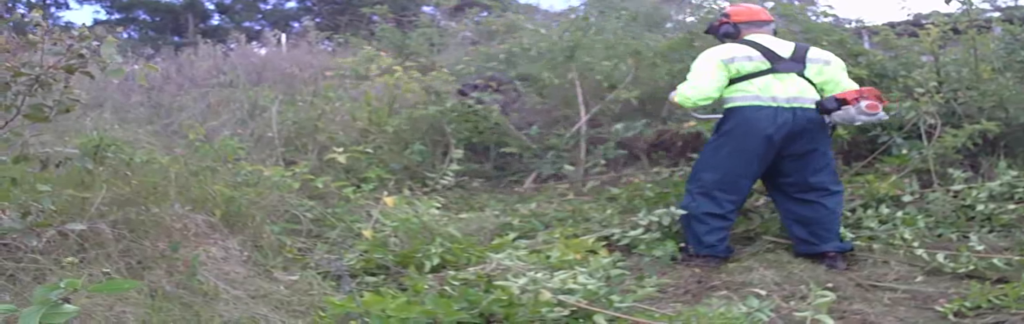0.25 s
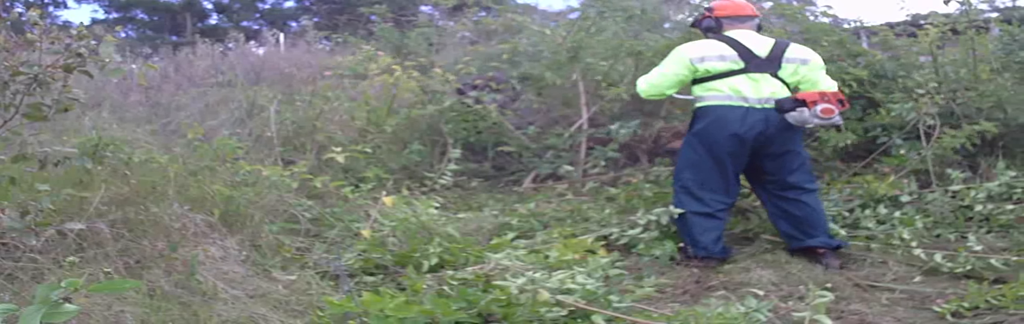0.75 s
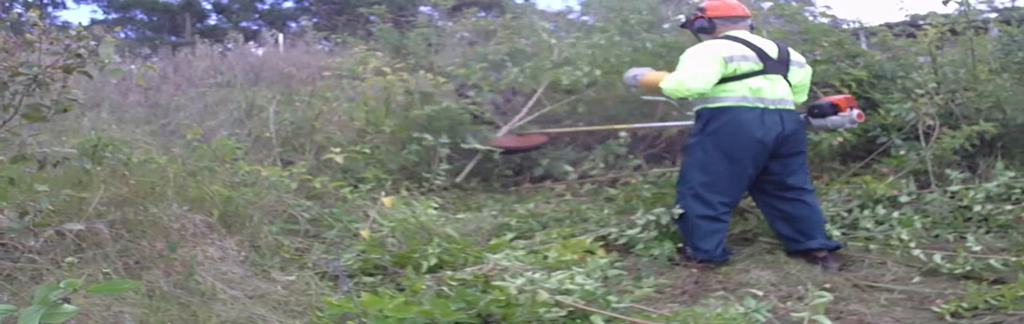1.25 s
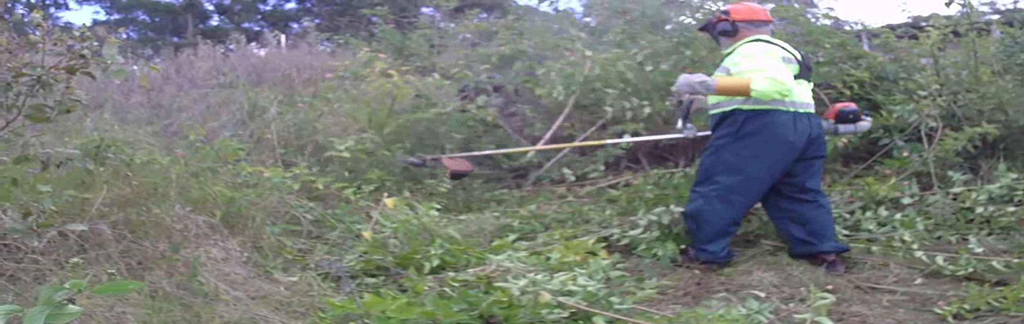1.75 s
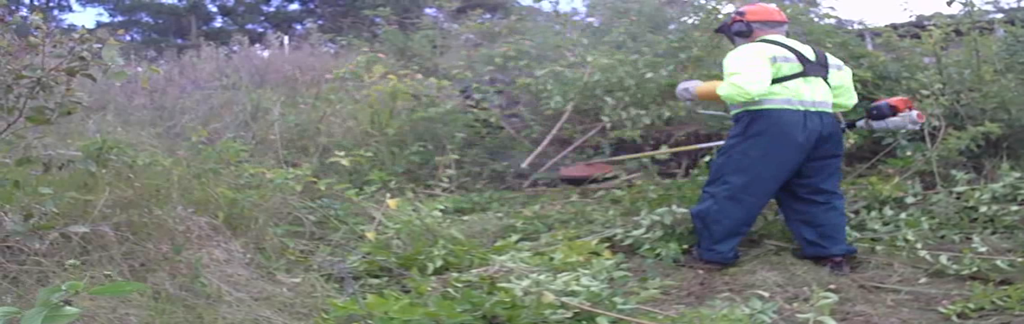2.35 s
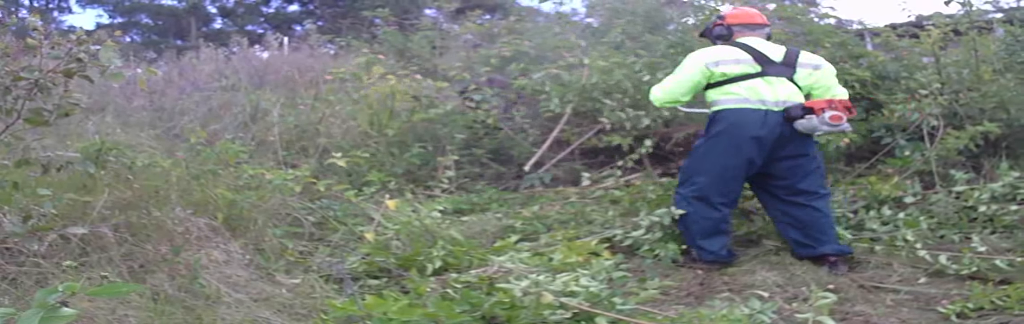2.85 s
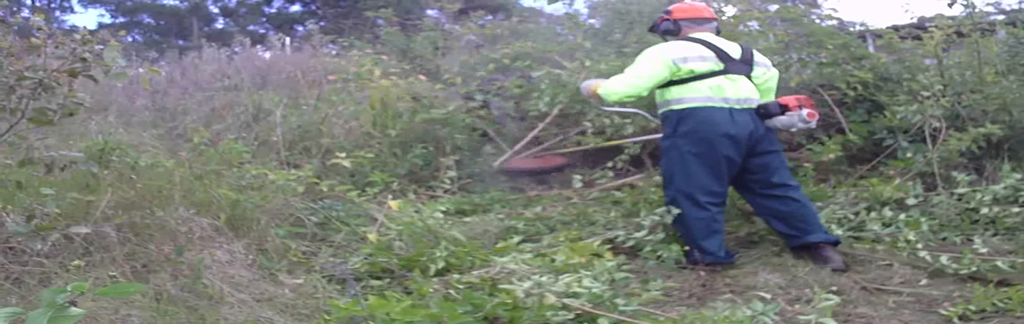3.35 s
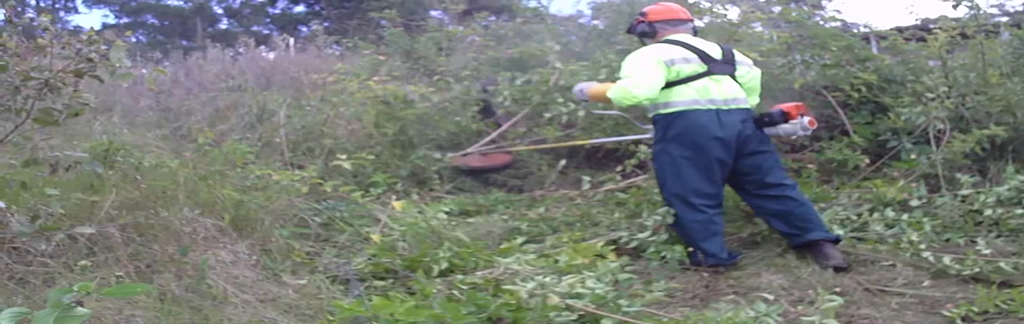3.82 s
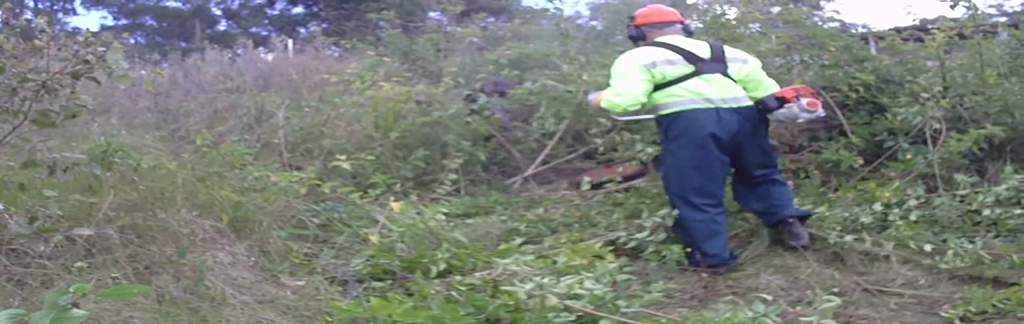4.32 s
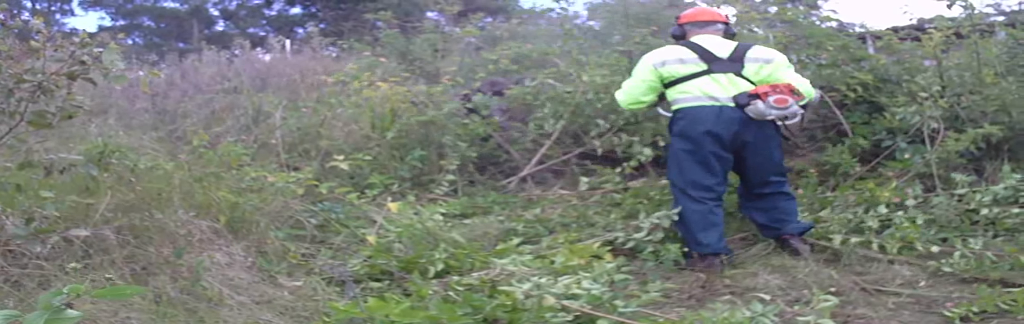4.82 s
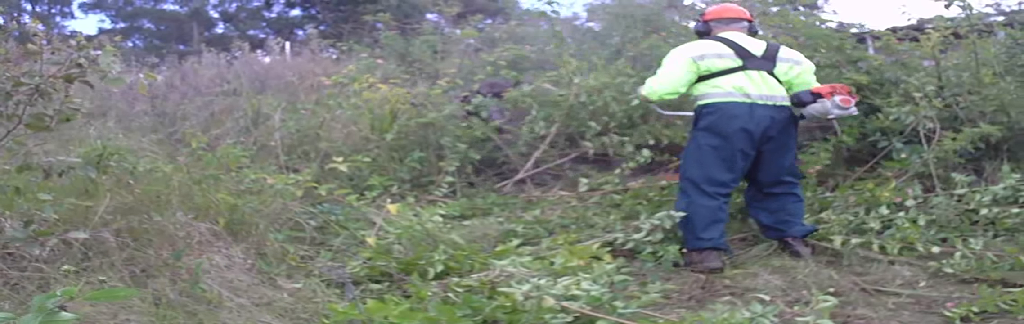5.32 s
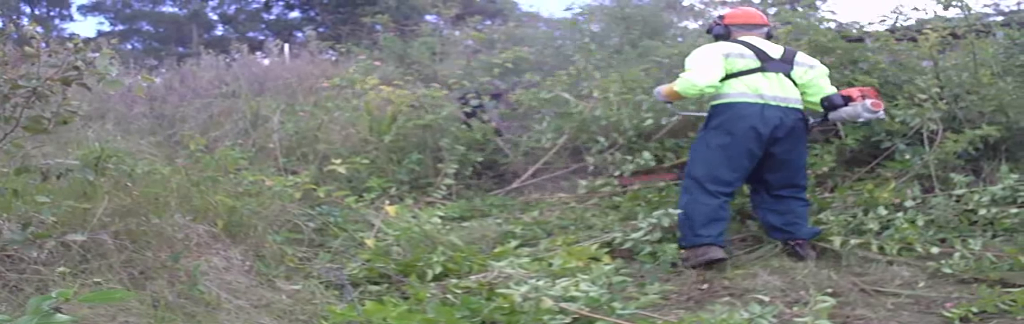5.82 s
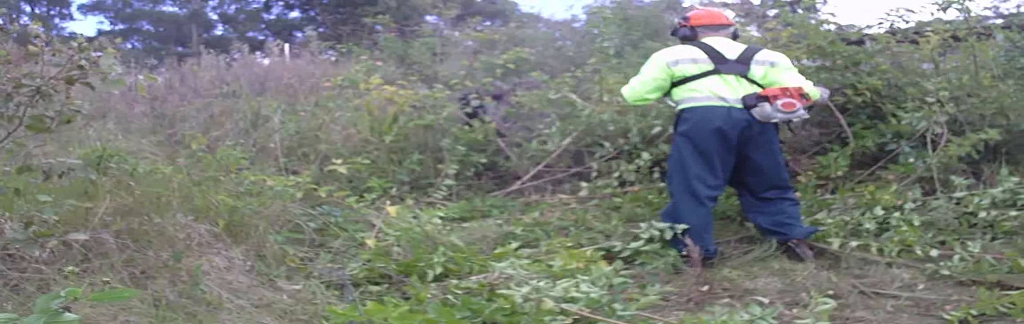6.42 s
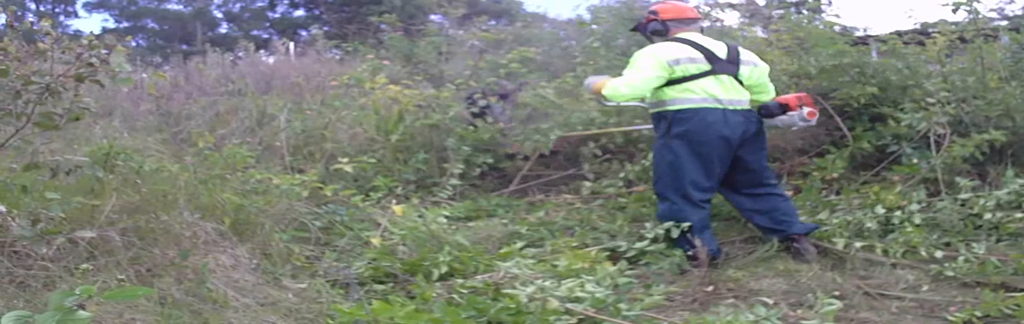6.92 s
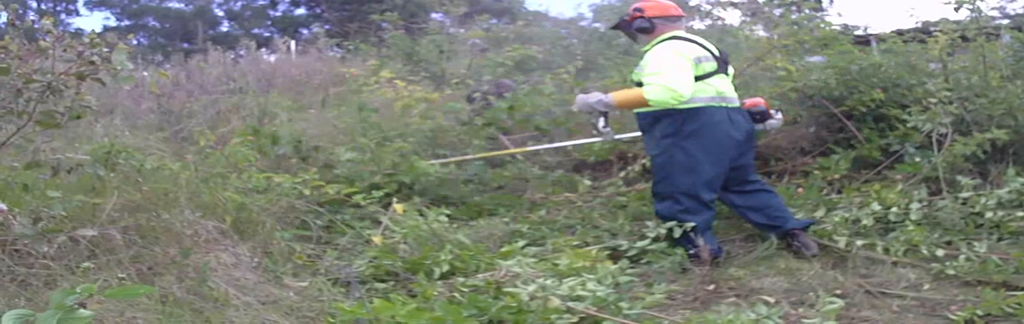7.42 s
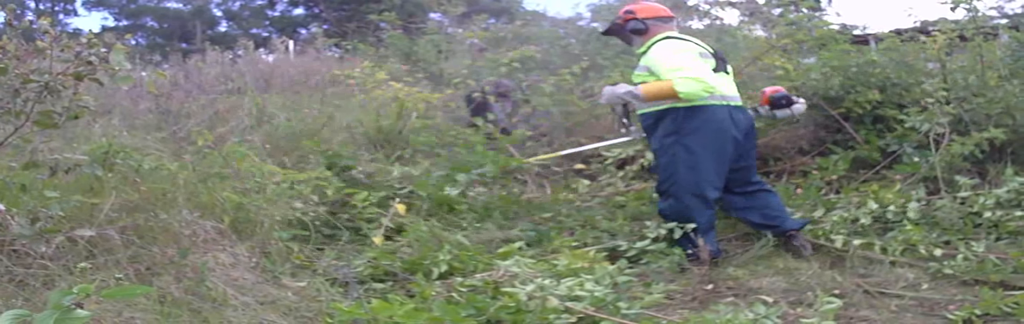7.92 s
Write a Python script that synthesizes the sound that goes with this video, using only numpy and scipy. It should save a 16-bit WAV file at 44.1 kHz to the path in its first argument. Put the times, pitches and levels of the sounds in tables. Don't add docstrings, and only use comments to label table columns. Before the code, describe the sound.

A petrol brushcutter works a few metres away outdoors, loud and centred, over faint low field rumble and short scatter from bushes. At 0 s the engine is bogged, jerking roughly while stems snap; it climbs to full, ringing revs by 1 s, briefly skipping sparks. Sharp cracks at 1.1-1.4 s accompany a light sag. From about 1.8 to 3.2 s it stutters and pops on the limiter, with more stem cracks from 2.1 s. A thick clump drags it down at 3.3 s; it recovers near 3.9 s and stutters until 5 s. Then comes the deepest bog, coarse and lower, with clustered cracks and woody knocks through 5.9 s. Revs climb back over 6 s, dip at 6.7 s, and return to limiter skips from 7.3 s to the end near 8.2 s. Blade hiss and leafy shredding pulse throughout; the level ducks after hard blows.

```python
import sys
import numpy as np
from scipy import signal
from scipy.fft import rfft, irfft
from scipy.io import wavfile
from scipy.ndimage import uniform_filter1d

SR = 44100
rng = np.random.default_rng(int(sys.argv[2]) if len(sys.argv) > 2 else 0)


def wav_record(signal):
    frames = np.transpose(np.atleast_2d(signal))
    bounded = np.clip(frames, -1, 1)
    quanta = np.round(bounded * 32767).astype(np.int16)
    wavfile.write(sys.argv[1], SR, quanta)


def gain_from_db(level_db):
    decades = np.asarray(level_db, float) / 20
    return 10 ** decades


N = 360297
T = np.arange(N) / SR
TOP_SPEED_HZ = 85.6
RING_HZ = 3262

# (time [s], share turned side-on [0-1])
SIDE_ON = [(0, 1.07), (.45, 0.23), (.95, 0.17), (1.3, 1), (2.0, 1), (2.5, .6), (2.8, 0.23), (3.2, 0.33),
           (3.39, 1), (4.0, 0.77), (4.45, 0.08), (5.0, 0.25), (5.4, 1), (5.9, 0.8), (6.2, 0.14), (6.62, 0),
           (6.97, 1), (8.17, 0.8)]


def level(x, db):
    return x * gain_from_db(db) / np.sqrt(np.mean(x ** 2))


def colour(x, points):
    hz, db = np.transpose(points)
    log_hz = np.log(np.arange(1, N // 2 + 2) * SR / N)
    gain = gain_from_db(np.interp(log_hz, np.log(hz), db, left=-80, right=-80))
    return level(irfft(rfft(x) * gain, N), 0)


def white():
    return rng.standard_normal(N)


def follow(points):
    return np.interp(T, *np.transpose(points))


def walk(rate_hz, s=T):
    return 1.2 * np.interp(s * rate_hz, np.arange(600), rng.standard_normal(600))


def resonance(hz, centre_hz, half_width_hz):
    return 1 / (1 + ((hz - centre_hz) / half_width_hz) ** 2)


def puff(phase, sharp, spread_db):
    size = gain_from_db(spread_db * rng.standard_normal(4000))[phase.astype(int)]
    return uniform_filter1d(size, size=30) * np.exp(-sharp * np.cos(2 * np.pi * phase))


def field_rumble():
    # (frequency [Hz], density [dB per Hz])
    rumble = [(20, 1), (60, -3), (120, -2), (220, -2.5), (320, -2)]
    return gain_from_db(-53) * colour(white(), rumble)


def bushes(dry):
    t = np.arange(3000) / SR
    echoes = rng.standard_normal(3000) * np.exp(-t / 0.012) * (t > .003)
    return gain_from_db(-21) * signal.fftconvolve(dry, echoes / np.sqrt(np.sum(echoes ** 2)))[:N]


def stems():
    # (time [s], peak [dB], knock over peak [dB])
    woody = [(0.0169, 2, -23), (0.0905, 4.5, -31), (0.17, -2, -20), (0.2335, 0, -34), (1.2054, 8, -31),
             (2.1268, 7, -21), (2.4154, -2, -24), (2.6513, 0, -18), (2.8486, -2, -19), (3.059, -5, -20),
             (3.1057, -2, -14), (3.2126, 7, -31), (3.324, 5, -26), (4.016, -1, -15), (4.0635, -3, -28),
             (4.334, 3, -33), (4.5749, 2, -14), (4.6818, -2, -4), (5.0717, -1, -9), (5.1809, 6, -16),
             (5.6133, 0.5, -10), (5.655, 3, -17), (5.6825, 3, -17), (5.7355, -3, -24), (5.7832, -6, -9),
             (5.8796, -11, -26), (6.0555, -1, -13), (6.091, 2, -18), (6.2927, -10, -11), (6.6265, -6, -21)]
    # (time [s], peak [dB], knock over peak [dB])
    more_stems = [(1.068, 6, -15), (1.098, 3, -6.5), (1.11, -4, -14), (1.125, -1, -10), (5.09, 0, -20),
                  (1.382, -7, -22), (3.274, 4, -21), (3.299, 0, -13), (5.205, 1, -12), (5.305, -4, -3),
                  (5.322, -2, -24), (5.44, -2, -8), (5.461, -1, -24), (5.812, 0, -9), (6.713, 6, -14),
                  (7.379, 5, -36), (7.715, -8, -22)]
    wood = signal.butter(2, (600, 1900), "band", fs=SR, output="sos")
    lead, length = 1000, 4000
    out = np.zeros(N + length)
    t = (np.arange(length) - lead) / SR
    for (s, peak_db, knock_db), tone in zip(woody + more_stems, rng.random(100)):
        noise = rng.standard_normal((2, length))
        tearing = np.exp(-np.abs(t) / .0003) + .15 * np.exp(-np.abs(t - .002) / .006)
        crack = signal.lfilter([1, 0, -1], [1, -.7 - .5 * tone, .4], noise[0] * tearing)
        knock = signal.sosfilt(wood, noise[1]) * np.exp(-np.abs(t - .002) / 0.0072)
        i = max(int(s * SR) - lead, 0)
        blow = crack / np.abs(crack).max() + gain_from_db(knock_db + 4.5) * knock
        out[i:i + length] += gain_from_db(peak_db - 3.5) * blow
    return signal.sosfilt(signal.butter(2, 400, "high", fs=SR, output="sos"), out[:N])


def speed():
    # (time [s], speed lost [Hz], fall [s], hold [s], climb back [s])
    sags = [
        (-.2, 12, .1, 0.19, .83),
        (1.051, 3.5, 0.077, 0.28, 0.29),
        (3.273, 5.5, 0.072, .17, .37),
        (4.38, 1.03, 0.137, 0.3234, 0.1377),
        (5.06, 13.5, 0.27, 0.51, 0.69),
        (5.419, 2, 0.1004, .12, 0.1997),
        (5.901, -0.8, 0.305, 0.0479, 0.251),
        (6.448, 1.06, 0.091, .14, 0.053),
        (6.681, 3.5, 0.085, 0.12, 0.34),
    ]
    lost = 0
    for s, lost_hz, fall_s, hold_s, climb_s in sags:
        lost = lost + np.interp(T, np.cumsum([s, fall_s, hold_s, climb_s]), [0, lost_hz, lost_hz, 0])
    return uniform_filter1d(TOP_SPEED_HZ - lost + .28 * walk(9), size=1500)


def sparks(cycle):
    # (from [s], to [s], one spark dropped in so many [cycles])
    cuts = [(.96, 1.1, 2), (1.76, 2.15, 2), (2.25, 2.4, 2), (2.56, 2.89, 3), (2.95, 3.14, 3),
            (3.18, 3.28, 2), (3.9, 4.06, 2), (4.12, 4.28, 3), (4.38, 4.5, 3), (4.56, 5.04, 3),
            (7.33, 7.5, 4), (7.6, 7.72, 4), (7.9, 8.07, 2), (8.12, 8.17, 2)]
    fired = np.ones(N)
    for start, end, every in cuts:
        fired[(T > start) & (T < end) & (cycle.astype(int) % every == 0)] = 0
    return uniform_filter1d(fired, size=60)


def jerks(cycle):
    lag_cycles, decay_cycles, jolt_per_hz = .25, .25, .085
    lost_hz = np.clip(TOP_SPEED_HZ + 2 - np.gradient(cycle) * SR, 0, 18)
    cycle = cycle + 1 - lag_cycles
    size = gain_from_db(2.5 * rng.standard_normal(4000))[cycle.astype(int)]
    jolt = 1 + jolt_per_hz * lost_hz * size * np.exp(-(cycle % 1) / decay_cycles)
    return uniform_filter1d(jolt, size=60) / np.sqrt(uniform_filter1d(jolt ** 2, size=5000))


def blade(cycle, bite, jerk, hum_db, hiss_db, shred_db):
    # (frequency [Hz], density [dB per Hz])
    air = [(3300, -11.5), (4200, 0.5), (5000, 0.5), (5800, -1), (7200, 0.5), (9300, -3), (10300, -4.5),
           (11500, -17)]
    # (frequency [Hz], density [dB per Hz])
    leaves = [(7400, -28), (8800, -5), (9600, -8.5), (10600, -6.5), (12500, -4.5), (14000, -12),
              (15900, -19)]
    teeth = 30 / 7 * cycle
    hum = gain_from_db(hum_db - 17.5 + 1.4 * walk(3.46)) * np.sin(2 * np.pi * teeth)
    gate = bite * puff(teeth, 0.11, 0.99)
    grains = rng.standard_normal((2, N)) * gain_from_db(2.0 * np.minimum(rng.exponential(size=(2, N)), 5))
    hiss = gain_from_db(.5 * walk(27)) * colour(gate * jerk * grains[0], air)
    shred = gain_from_db(0.42 * walk(14)) * colour(gate * jerk ** 0.18 * grains[1], leaves)
    return hum + gain_from_db(hiss_db - 0.55) * hiss + gain_from_db(shred_db + 0.4) * shred


def orders(cycle, fired, turn, limiting):
    behind = [-32, -21, -19.5, -3.5, -13, -22, -6, -19.5, -11.5, -16, -26.5, -12.5, -12, -10.5, -27.5,
              -13.5, -10, -23, -35, -8, -18, -28, -31, -9, -8, -21, -18, -17, -24, -24, -25, -14, -16, -8.5,
              -18, -22, -13.5, -18, -19, -9]
    side = [-32.5, -25.5, -30.5, -6, -15.5, -4.5, -5.5, -20, -16, -13, -15.5, -13.5, -26, -11.5, -15, -26,
            -33, -23, -16, -14.5, -22, -24, -30, -13, -33, -25, -13, -25, -27, -16.5, -20, -17, -33, -22,
            -24, -27, -22, -13, -28, -19]
    bog = {5: -.2, 6: -.15, 7: -.4, 9: -.4, 12: -.7, 24: -.5}
    coast = {4: -4, 5: -14, 7: -22, 8: 40, 13: -8}
    parts, hop = np.zeros((3, N)), 32
    hz = np.gradient(cycle) * SR
    strain = np.clip(-uniform_filter1d(np.gradient(hz), size=3000) * SR / 30, 0, 1)[::hop]
    s, hz, turn, limiting = T[::hop], hz[::hop], turn[::hop], limiting[::hop]
    for k, (behind_db, side_db) in enumerate(zip(behind, side), start=1):
        db = behind_db + turn * (side_db - behind_db) - 1
        db = db + (.9 + (k % 4 > 0) * .05 * k + strain) * walk(7, s)
        db = db + 6 * (1 - strain) * (1 - .6 * turn) * resonance(k * hz, RING_HZ, 70)
        db = db + 3.5 * (1.2 - 1.5 * limiting) * resonance(k * hz, 1110, 90)
        db = db - strain * (3 + 7 * (k > 4)) + bog.get(k, 0) * (TOP_SPEED_HZ - 2 - hz)
        db = db + limiting * coast.get(k, 0) * (1 if k < 6 else 1 - turn)
        db = db + 2.5 * (1 - turn) * (k in (16, 20, 24, 38)) - 1.5 * (k == 4)
        loss = .7 if k % 4 and k < 12 else .25
        lag = np.pi * k if 9 < k < 19 else 1.3 * k * k
        lag = lag + .012 * k * walk(25, s) + .2 * strain * min(k, 8) * walk(45, s)
        size = np.repeat(np.sqrt(2) * gain_from_db(db), hop)[:N]
        lag = np.repeat(lag, hop)[:N]
        tone = np.sin(2 * np.pi * k * cycle - lag)
        parts[int(k > 7) + int(k > 26)] += size * (1 - loss * (1 - fired)) * tone
    return parts


def engine(cycle, shake, thump_db, muffler_db, casing_db):
    # (frequency [Hz], density [dB per Hz])
    thump_gas = [(150, -36), (260, -8), (450, -2.5), (650, 7), (900, -10)]
    # (frequency [Hz], density [dB per Hz])
    muffler_gas = [(500, -43), (700, 3), (1100, 6), (1500, 7), (2100, 10.5), (2700, 10)]
    # (frequency [Hz], density [dB per Hz])
    casing = [(1900, -61), (2400, -4.5), (2900, 3.5), (3150, 2), (3260, 2.5), (3400, 2.5), (3750, 1.5),
              (4300, -15)]
    # (frequency [Hz], density [dB per Hz])
    panel = [(3100, -20), (3220, -3), (3265, 0), (3320, -3), (3450, -20)]
    # (frequency [Hz], density [dB per Hz])
    pop_side = [(220, -28), (300, -15), (400, -18), (490, -2), (590, 0), (660, -12), (1000, -24)]
    # (frequency [Hz], density [dB per Hz])
    pop_behind = [(220, -26), (300, -12), (400, -14), (480, -8), (600, -5), (700, 0), (1000, -16)]
    # (frequency [Hz], density [dB per Hz])
    cooling = [(10500, -14), (13000, -4), (14500, 0), (15900, -1)]
    fired = sparks(cycle)
    turn = np.clip(follow(SIDE_ON), -.2, 1.2)
    share = np.clip(turn, 0, 1)
    low, middle, high = orders(cycle, fired, turn, uniform_filter1d(1 - fired, size=3000))
    gate = (5.5 + 0.039 * fired) * puff(cycle, 0.11, 0.13) * puff(4 * cycle, 0.043, 0.15)
    kick = np.maximum(np.gradient(fired), 0) * gain_from_db(walk(40))
    pops = share * colour(kick, pop_side) + (1 - share) * colour(kick, pop_behind)
    thump = low + gain_from_db(-15.0) * pops + gain_from_db(-13.5) * colour(gate * white(), thump_gas)
    blow = colour(shake * gate * white(), muffler_gas)
    muffler = gain_from_db(-1.18) * middle + gain_from_db(-2.0 + 1.46 * turn) * blow
    rattle = gain_from_db(-0.9) * high + gain_from_db(-2.5 + 1.0 * turn) * colour(shake * gate * white(), casing)
    tuned = resonance(38 * np.gradient(cycle) * SR, RING_HZ, 60)
    rattle = rattle + gain_from_db(-7.5 - 3.5 * share) * tuned * colour(gate * white(), panel)
    fan = gain_from_db(-39) * colour(shake * white(), cooling)
    return fan + gain_from_db(thump_db) * thump + gain_from_db(muffler_db) * muffler + gain_from_db(casing_db) * rattle


def scene():
    # (time [s], gain [dB])
    engine_view = [(0, 0), (.3, 0.5), (.55, 3.5), (1.0, 0.5), (1.4, 0.5), (2.1, 3), (2.55, -2), (3.0, 3),
                   (3.5, 0.5), (3.9, 2.5), (4.35, -2), (4.8, 1.5), (5.2, 5), (5.9, 2), (6.2, 1.5),
                   (6.8, 0.5), (7.3, 1.5), (8.17, 3)]
    # (time [s], gain [dB])
    blade_view = [(0, -2), (.4, -3), (.9, 0), (1.3, 0.5), (1.8, 2), (2.25, 4), (2.65, -1.5), (3.15, 2),
                  (3.5, -1), (3.9, 2.5), (4.27, 2), (4.6, -2.5), (5.0, -0.5), (5.7, -3), (6.3, -2.5),
                  (6.95, 1.5), (7.8, 0.5), (8.17, 2)]
    # (level [dB], side-on [dB], per lost speed [dB/Hz], half the sparks cut [dB], view share [1])
    thump_rule = (-30.5, -1, -0.18, 3, 1.03)
    muffler_rule = (-21.5, -2.5, -0.0955, 0.5, 0.82)
    casing_rule = (-18.5, -2.5, -0.1026, .5, 0.35)
    hiss_rule = (-18, -1, 0.29, -0.4, 0.64)
    shred_rule = (-23, -0.5, -0.19, -1, 1.2)
    hz = speed()
    cycle = np.cumsum(hz) / SR
    turn = follow(SIDE_ON)
    cut = 2 * uniform_filter1d(1 - sparks(cycle), size=3000)

    def heard_db(rule, view):
        return np.dot(rule, [np.ones(N), turn, TOP_SPEED_HZ - hz, cut, follow(view)])

    thump_db = heard_db(thump_rule, engine_view)
    muffler_db = heard_db(muffler_rule, engine_view)
    casing_db = heard_db(casing_rule, engine_view)
    hiss_db, shred_db = heard_db(hiss_rule, blade_view), heard_db(shred_rule, blade_view)
    bite = gain_from_db(0.57 * walk(14) + 0.27 * walk(45))
    jerk = jerks(cycle)
    shake = bite ** 0.99 * jerk ** 0.8
    dry = stems() + blade(cycle, bite, jerk, thump_db, hiss_db, shred_db)
    dry = dry + engine(cycle, shake, thump_db, muffler_db, casing_db)
    mono = dry + bushes(dry) + field_rumble()
    return np.array([mono, mono])


def gain_control(x):
    # (time [s], depth [dB], recovery [s])
    ducks = [(.04, 2, 0.18), (.254, 6.5, 0.097), (1.127, 3.5, .06), (1.216, 5, 0.084), (1.41, 2.5, .06),
             (2.138, 8, 0.071), (2.58, 2, .1), (2.945, 3.5, 0.14), (3.29, 2, 0.17), (3.351, 7.5, .17),
             (4.287, 5.5, .06), (4.36, 4, 0.1), (5.02, 3, 0.047), (5.109, 1, .06), (5.212, 2.5, 0.065),
             (5.333, 4.5, 0.05), (5.471, 3, 0.14), (5.89, 3.5, 0.063), (6.64, 2, 0.041), (6.799, 1.5, .06),
             (7.236, 1.5, 0.043), (7.383, 5.5, 0.092), (7.725, 6.5, 0.088), (7.975, 5, 0.054)]
    duck_db = 0
    for s, depth_db, back_s in ducks:
        since = np.maximum(T - s, 0) / max(1.42 * back_s, .02)
        duck_db = duck_db + 0.67 * depth_db * np.exp(-since ** 2.03) * (T > s)
    return x * gain_from_db(-uniform_filter1d(duck_db, size=350))


def band_gaps(x):
    centres_hz = (3951, 7897, 11805)
    widths_hz = (60, 85, 55)
    f = np.arange(N // 2 + 1) * SR / N
    gain = 1
    for hz, width_hz in zip(centres_hz, widths_hz):
        gain = gain * (1 - .95 * resonance(f, hz, width_hz))
    return irfft(rfft(x) * gain, N)


def band_limit(x):
    return signal.sosfilt(signal.butter(12, 15730, fs=SR, output="sos"), x)


def record(dry):
    x = band_gaps(gain_control(dry)) / .93
    mix = .93 * np.tanh(x + x ** 3 / 3)
    return band_limit(mix)


dry = scene()
out = record(dry)
wav_record(out)
```